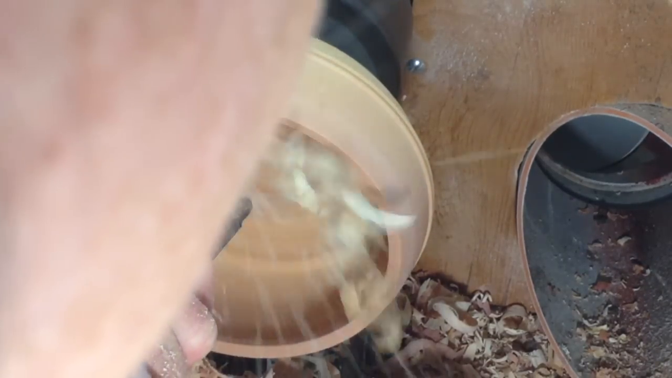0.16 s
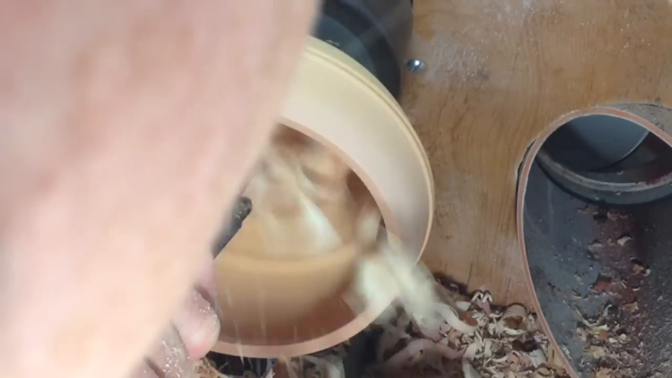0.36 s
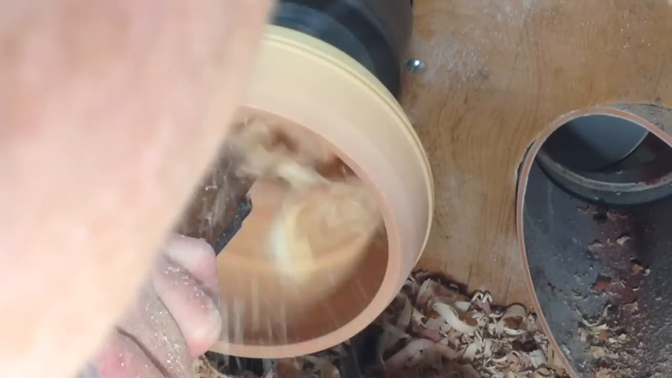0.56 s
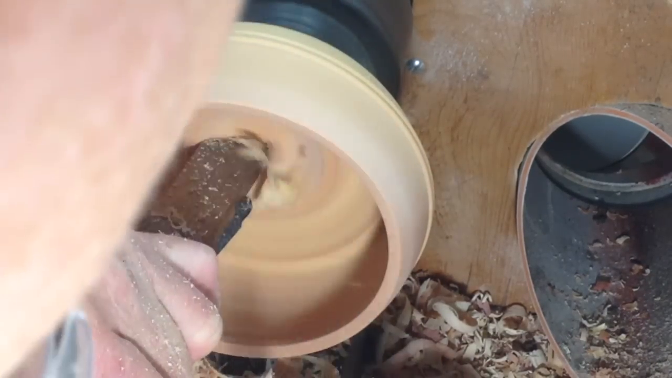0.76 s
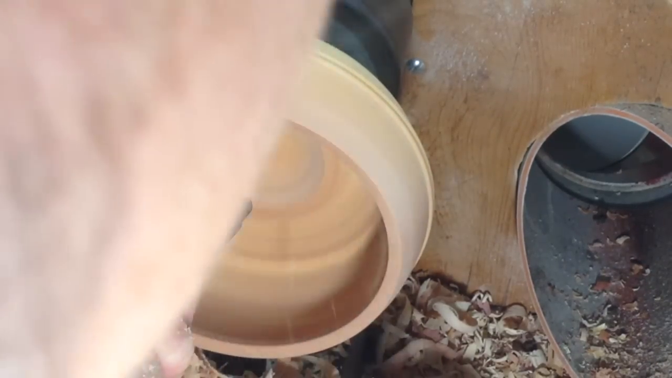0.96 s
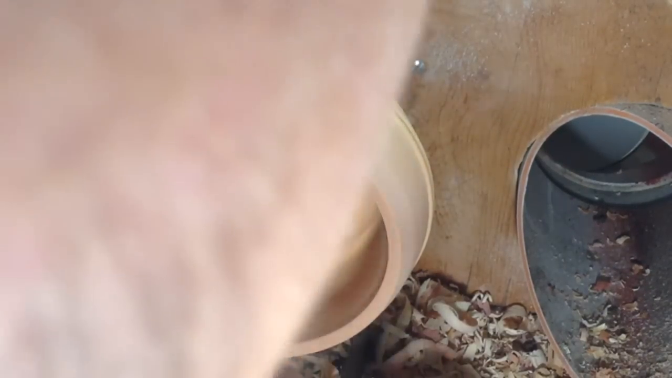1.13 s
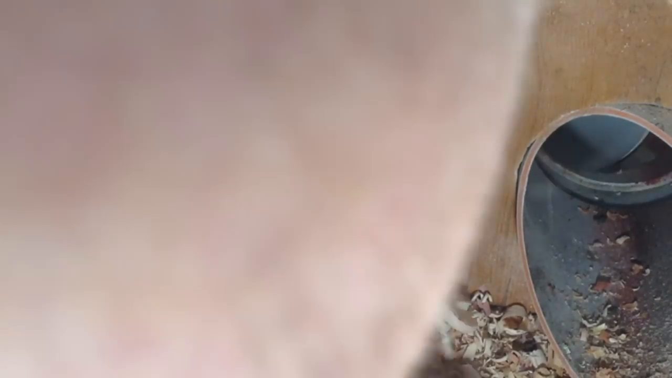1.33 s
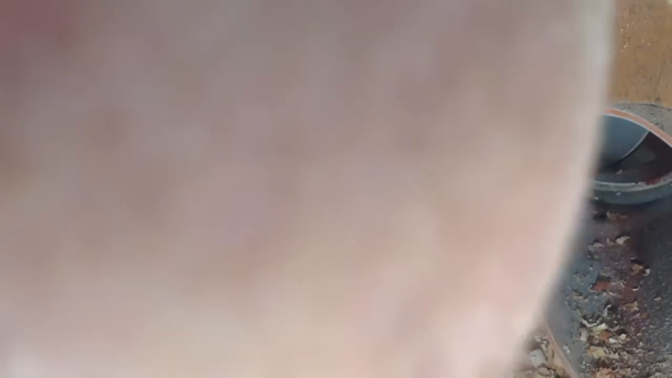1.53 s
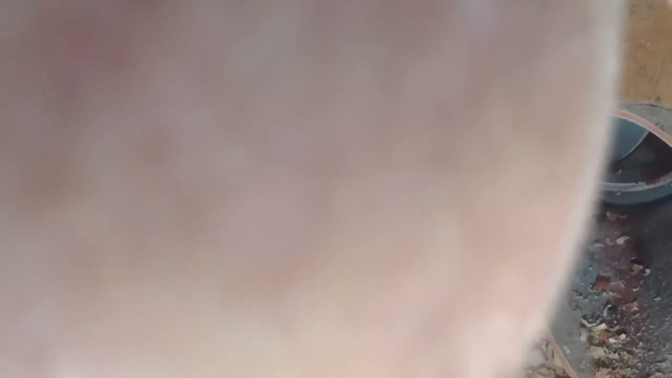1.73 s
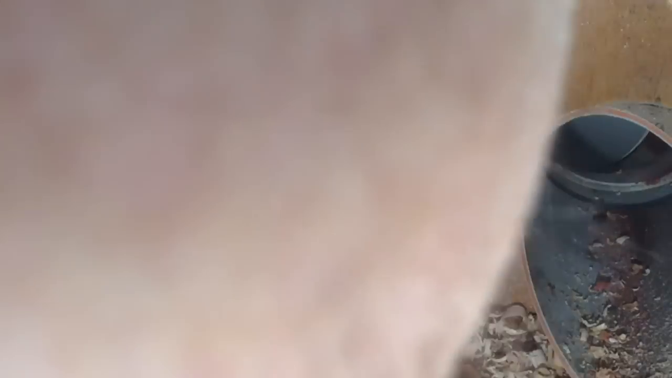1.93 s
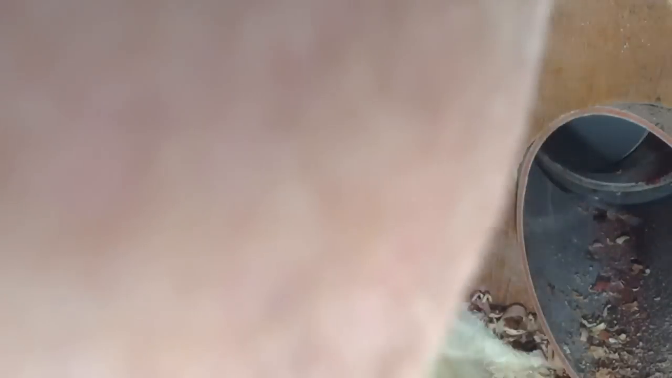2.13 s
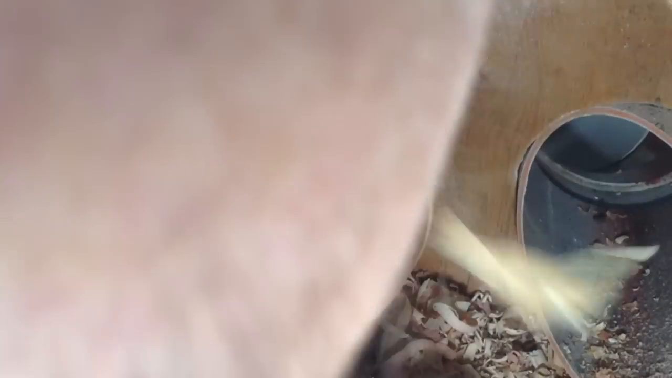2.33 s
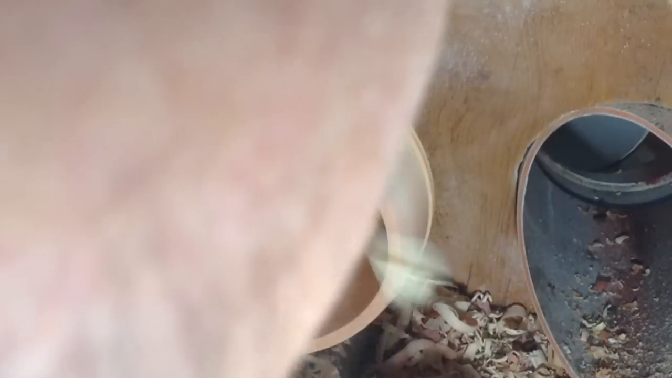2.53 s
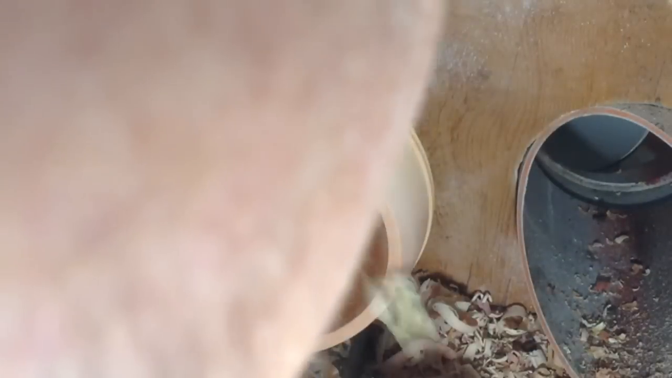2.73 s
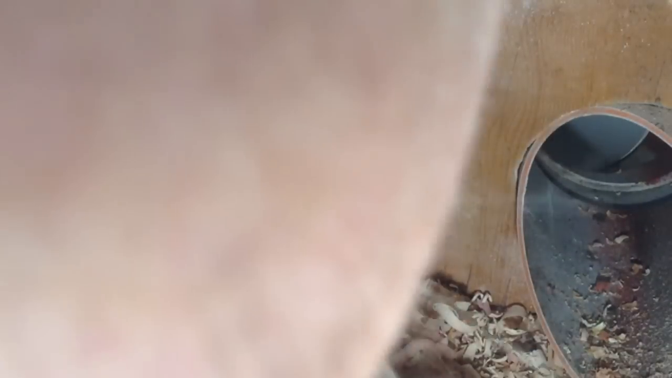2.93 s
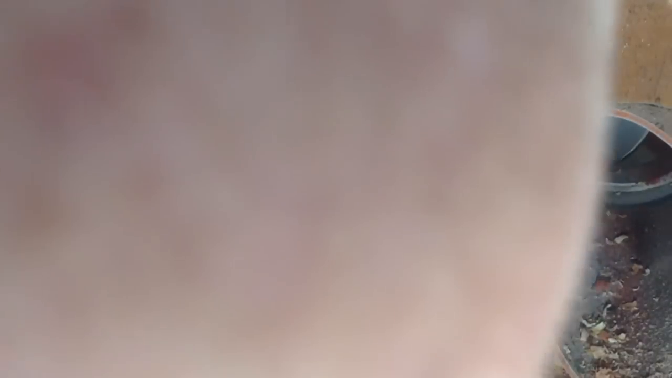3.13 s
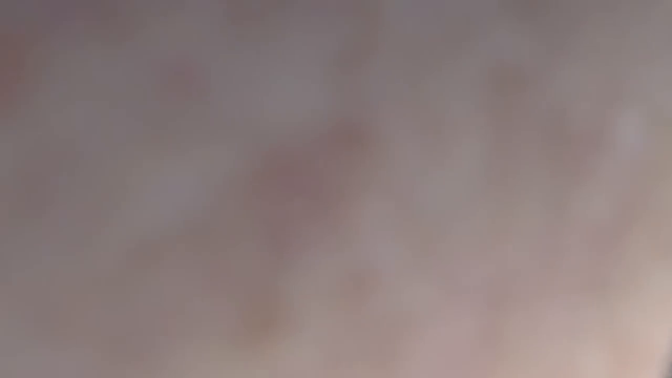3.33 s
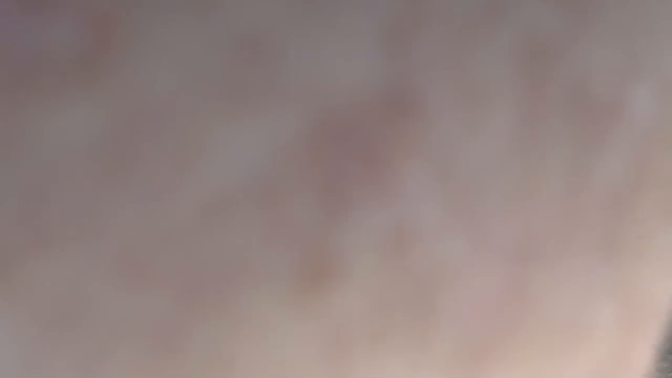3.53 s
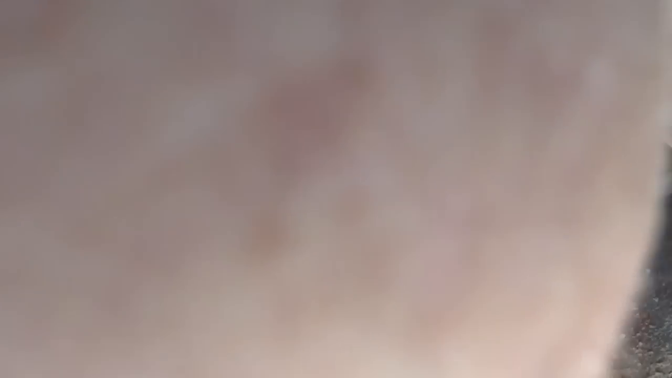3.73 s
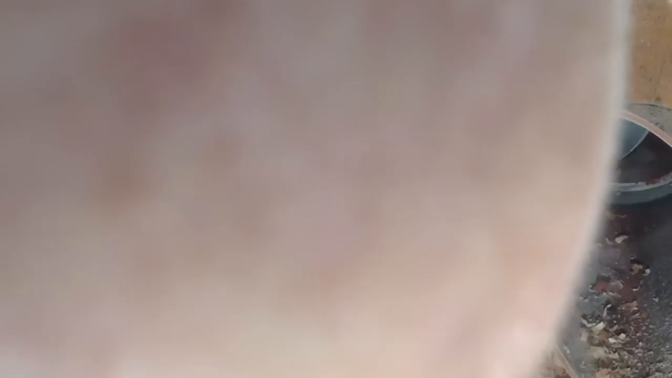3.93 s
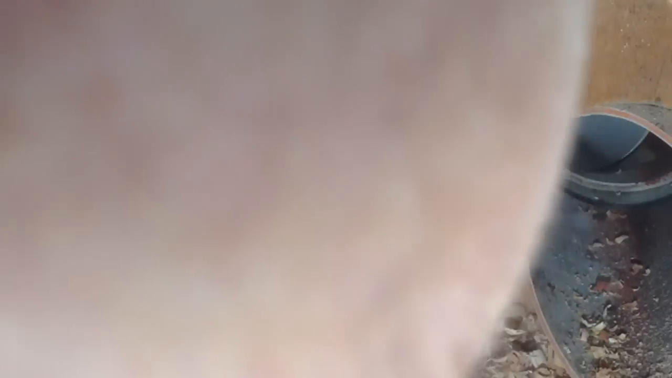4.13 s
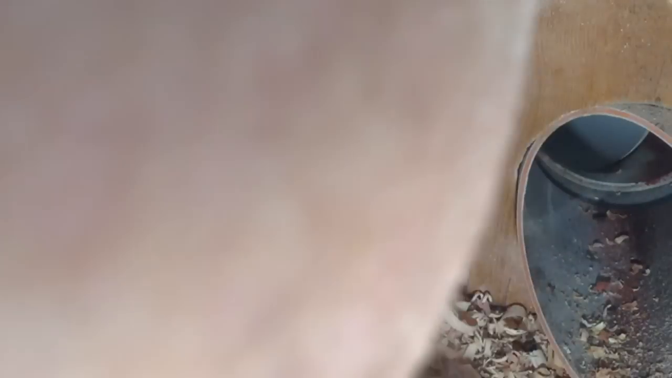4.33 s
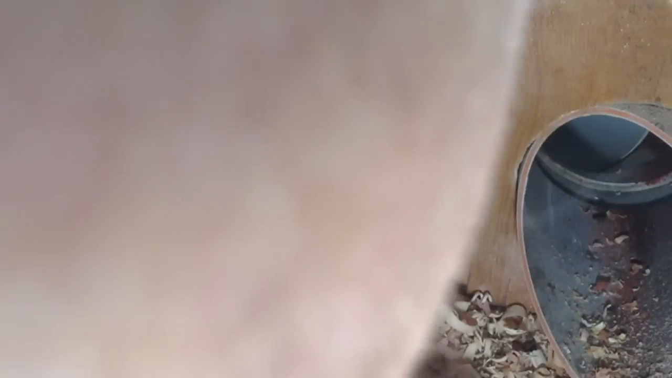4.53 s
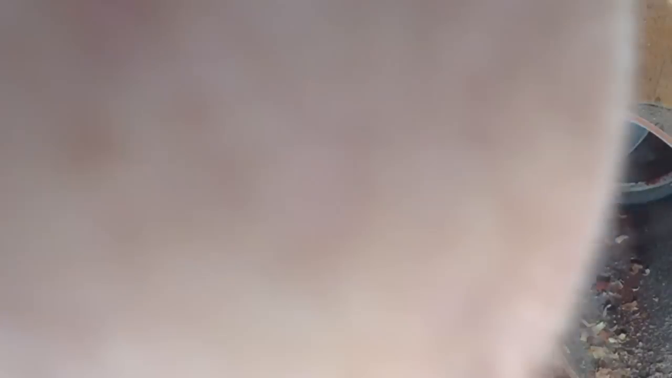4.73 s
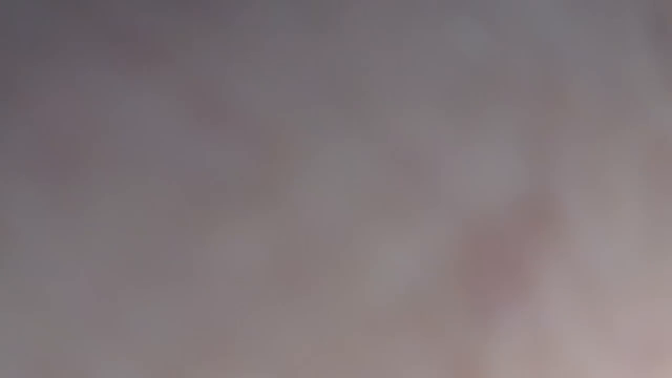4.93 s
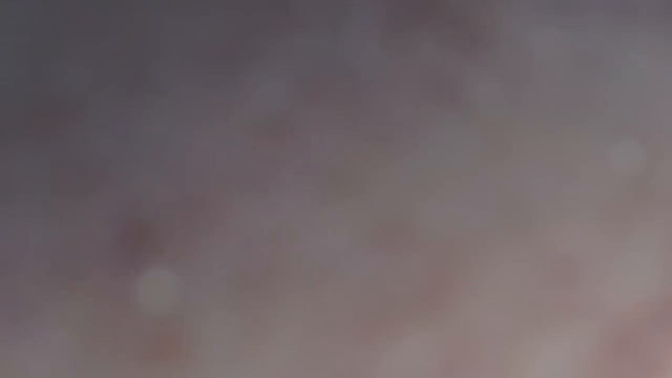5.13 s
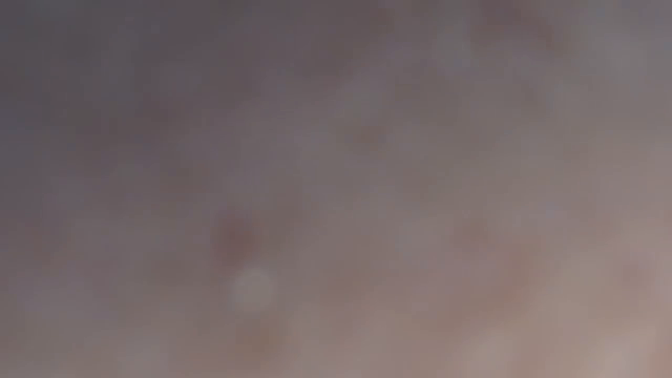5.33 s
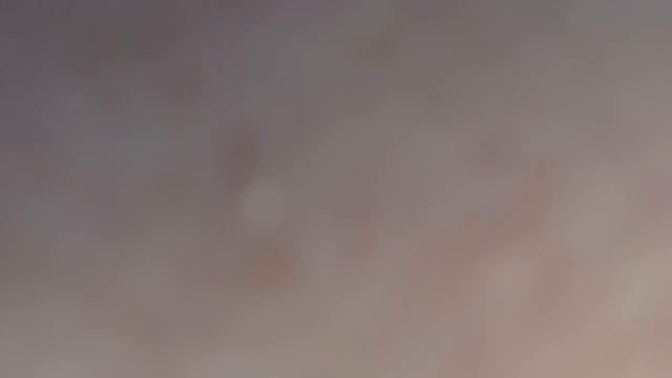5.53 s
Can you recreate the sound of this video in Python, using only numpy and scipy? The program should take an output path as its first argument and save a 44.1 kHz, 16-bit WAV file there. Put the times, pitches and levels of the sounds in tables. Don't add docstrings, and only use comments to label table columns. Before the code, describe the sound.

A wood lathe spins at about 22 turns a second while a hand scraper cuts inside a bowl. From 0 s a coarse, hissing rasp flutters with the rotation, with scuffs and a strong low chatter near 220 Hz at about 0.5-0.65 s, then it lifts off. A very faint touch comes at 0.85 s over quiet motor hum. At 1.1 s a light, bright scrape begins, swelling after 1.35 s into a full rasp, with a knock and loud chatter around 2.2 s. A new stroke from 2.36 to 3.35 s swells, shudders briefly near 2.7 s, eases and swells again. A firm stroke from 3.4 to 4.43 s is rough and steady, with chatter and sharp ticks. Motor and belt idle softly until 5.1 s, when a thin, light scrape returns, growing woodier towards the end at 5.6 s. Close small microphone, short dry room, slight overload.

```python
import sys
import numpy as np
from scipy import signal
from scipy.fft import next_fast_len
from scipy.io import wavfile
from scipy.ndimage import uniform_filter1d

SR = 44100
rng = np.random.default_rng(int(sys.argv[2]) if len(sys.argv) > 2 else 0)


def nominal_scale(level):
    x = np.asarray(level, float) / 20
    return 10 ** x


def inscribe(sig):
    pcm = np.round(np.clip(np.atleast_2d(sig).T, -1, 1) * 32767)
    wavfile.write(sys.argv[1], SR, pcm.astype(np.int16))


N = 250047
T = np.arange(N) / SR

# start_s, level_db
PRESSURE = [
    [(0, -26), (.43, -25), (.54, -23.5), (.6, -23), (.63, -27.5), (.728, -55), (.8, -59)],
    [(.835, -61), (.843, -43.5), (.889, -43.5), (.905, -66)],
    [(1.122, -62), (1.132, -36), (1.2, -36.5), (1.31, -36.5), (1.37, -27.5), (1.84, -22), (2.28, -24.5),
     (2.34, -33.5), (2.355, -55.5)],
    [(2.356, -46), (2.39, -31.5), (2.5, -25.5), (2.69, -27.5), (2.8, -33), (2.94, -32.5), (3.19, -24.5),
     (3.28, -30.5), (3.37, -71)],
    [(3.408, -52), (3.413, -33), (3.435, -27), (3.53, -34.5), (3.55, -28.5), (3.817, -24), (4.37, -23.5),
     (4.429, -53), (4.52, -84)],
    [(5.105, -63), (5.15, -44.5), (5.22, -43), (5.38, -39), (5.49, -38.5), (5.567, -33), (5.67, -38)],
]
# start_s, bowl_wall_db, shank_ring_db, blade_ring_db, edge_skim_db
HOLDS = [(0, -3.5, -7, -14, -7), (0.832, -8, -3, -7, -5), (1.1, -2.5, 2, 1, 0.5), (1.36, 0.2, -9, 4.4, 1),
         (2.36, -0.5, 2, 4.5, -4), (2.85, 1, -5, -1.5, 2.2), (3.4, 1.8, 5.5, -2, 5.5),
         (3.55, 0.9, -10, 1.5, 5.5), (3.88, -0.2, -17, 8, -0.5), (4.22, -0.3, 7, 6, -4.5),
         (5.1, 3.5, 10.5, -13, 10.5), (5.4, 7.5, -6, -5, 13)]
# start_s, level_db
SEAT = [(0, 3.5), (.7, 2), (1.36, 1.3), (2.33, -2.5), (2.5, 1.5), (2.77, -1), (3.02, -0.8), (3.55, 1.5),
        (4.3, -2.5), (5.4, 0.7)]
FRESH_TOUCHES = [1.125, 3.408, 5.13]
# start_s, lead_turns
LEAD = [(0, -0.14), (.6, -0.22), (1.3, 0.26), (1.7, 0.23), (2.3, 0.16), (2.9, 0.46), (3.3, 0.57),
        (3.5, 0.72), (4.1, 0.62), (4.4, 0.71), (5.1, 0.67), (5.3, 0.76), (5.43, 0.88), (5.67, 0.98)]
# pitch_hz, level_db (density per Hz)
RASP = [(530, -1), (900, -11.5), (1290, 3), (1790, -5.5), (1970, -7.5), (2250, 1), (2470, -7.5), (3100, -1),
        (3930, -11), (5360, -13.5), (7750, -22.5), (11600, -28.5), (15400, -33)]
# pitch_hz, width_hz, level_db (over the rasp)
BODY_MODES = [(1320, 210, -2.5), (1420, 55, 2), (1840, 180, 5), (2377, 480, 5.5), (2647, 63, 8.5),
              (3090, 36, 7), (3315, 65, 7.5), (3874, 310, 4.5), (4290, 190, 4), (6310, 92, 4),
              (6900, 200, 1.5), (7900, 200, -4), (8900, 240, 3)]
# pitch_hz, width_hz, level_db (to the layer they ride on)
SHANK = [(2168, 144, -7), (3153, 220, -15.5)]
BLADE = [(5237, 170, -10), (5370, 190, -11.5)]
EDGE = [(11200, 550, -20.5)]
# pitch_hz, width_hz, level_db
REST_MODES = [(206.5, 27, 0), (239.5, 22, 5.5), (294, 7.1, 3.5), (338, 10.7, -2.5), (381.2, 11.4, 2.5),
              (425.7, 12.5, 2), (488, 5.8, -3), (550, 107, -5.5), (682, 40, -7), (776, 60, -3),
              (952, 48, -8.5)]
# pitch_hz, level_db (density per Hz)
WASH = [(35, -33), (60, -13), (95, -10), (165, -6), (260, -7), (450, -13.5), (760, -17), (1250, -15.5),
        (2300, -22), (4700, -24), (8000, -32), (15400, -42)]
# pitch_hz, width_hz, level_db (over the wash)
HOUSING = [(402, 40, 3.5), (1190, 330, 3), (1460, 60, 5), (2900, 530, 6), (3650, 50, 11.5),
           (4970, 930, 4.5), (6000, 250, 7), (10300, 300, 3)]
# pitch_hz, level_db
HUM = [(23, -47), (49.5, -56), (151, -63), (176, -62), (311, -55.5), (620, -67)]
# start_s, pitch_hz, upper_over_lower_line_db, strongest_place_turns
CHATTER = [(0, 216.4, -30, 0.13), (.25, 215.7, 10, 0.16), (.4, 219.2, -7.5, 0.27), (.55, 222.1, 5.5, 0.24),
           (.72, 230, 4, 0.3), (1.5, 212.5, -10, 0.17), (1.95, 210, 2, 0.26), (2.1, 221.7, -1, 0.19),
           (2.3, 225.1, 2, 0.32), (2.45, 227.5, 21, 0.28), (2.62, 218.9, -11, 0.41),
           (2.75, 225.2, -6.5, 0.65), (2.9, 231.3, 10, .35), (3.8, 232, 10, 0.16), (4.12, 224, 12, .2),
           (4.3, 225.3, -12, 0.31), (4.5, 234, -6, 0.19), (5.5, 231, 17, .22)]
# full_s, release_s, level_db, growth_db_per_s, gouging_db (passed to rest and bowl)
BOUTS = [(0.096, 0.308, -31.5, 90, 10), (0.513, 0.649, -8.5, 102, 2), (2.098, 2.095, -23.5, 30.5, 6.5),
         (2.223, 2.311, -10, 70, -5.5), (2.46, 2.58, -33, 200, 15), (2.628, 2.66, -21, 250, 3),
         (2.684, 2.747, -14, 200, 0), (3.01, 3.049, -32.5, 200, 4), (3.472, 3.469, -26.5, 300, 7),
         (3.72, 3.965, -24, 62, .3), (4.27, 4.404, -20, 53, -1.5), (5.462, 5.57, -33, 350, -9),
         (5.6, 5.698, -25, 50, -9)]
# first_s, last_s, peak_db, pitch_hz, dry_scuff_share (0-1)
TICKS = [(0.072, .164, -11.5, 2820, 0.6), (.2553, .2553, -18, 1250, 0.3), (.408, .408, -9.5, 2460, 0.4),
         (0.841, .8849, -31, 2190, 0.84), (1.3493, 1.3498, -16, 2170, .35), (2.133, 2.133, -9.5, 1270, 0.2),
         (2.2223, 2.2223, -4.5, 1330, 0.56), (3.4267, 3.4271, -9, 2090, 0.56),
         (3.6737, 3.6736, -14, 1345, 0.62), (3.8077, 3.8077, -7, 2210, 0.76),
         (3.9877, 4.0332, -10, 1603, 0.82), (4.2115, 4.3006, -5, 2118, 0.61), (4.274, 4.319, -8.5, 3130, 0),
         (4.7431, 4.791, -35, 1650, 0.63), (4.9861, 4.9861, -37, 1340, .4),
         (5.1454, 5.3198, -18, 2150, 0.42), (5.3841, 5.5156, -16.5, 1225, 0.5),
         (5.5554, 5.5558, -7.5, 1320, 0.4)]
# start_s (the middle), pitch_hz, length_s, level_db
GROANS = [
    (.89, 240, .025, -45),
    (2.73, 92, .03, -36),
    (4.28, 292, .04, -31),
    (5.405, 392, .028, -30),
]

SPINDLE_PER_S = 22.4
FULL_DB = -24
HISS_DB, HISS_PER_SKIM, EDGE_PER_SKIM, FINEST_PER_SKIM = -4, 0.55, 0.19, 0.23
LIGHT_EDGE, LIGHT_FINEST = 0.2, 0.27
ENTRY_DB, ENTRY_S = 11, 0.13
RUN_OUT, RUN_OUT_PER_DB, FAR_SIDE_S = 1.01, 0.1, 4.9
REST_DB, REST_SLOPE, BED_DB, BED_SLOPE = -28.5, 0.87, -35, 1.25
DIES_DB_PER_S, TAKES_HOLD_DB = 258, -28
CHATTER_UNDER_DB, UNDER_SLOPE = -6.5, 1.9
CHATTER_IN_REST_DB, CHATTER_IN_BOWL_DB = -12.5, -21.5


def evened(x):
    return x / np.sqrt(np.mean(x ** 2) + 1e-20)


def curve(rows, order=1):
    rows = np.array(rows)
    return np.interp(T, rows[:, 0], rows[:, order])


def level(db):
    return uniform_filter1d(nominal_scale(db), size=120)


def colour(x, gain_of_hz):
    size = next_fast_len(N + 8192, real=True)
    hz = abs(np.fft.fftfreq(size, 1 / SR))
    log_gain = np.log(gain_of_hz(hz) + 1e-5)
    response = np.exp(np.conj(signal.hilbert(log_gain)))
    return np.fft.ifft(np.fft.fft(x, size) * response).real[:N]


def shape(points, hz):
    f, db = np.transpose(points)
    return nominal_scale(np.interp(np.log(hz + 1), np.log(f + 1), db))


def peak(hz, centre_hz, width):
    return 1 / (1 + (2 * (hz - centre_hz) / width) ** 2)


def modal_gain(modes, hz):
    return nominal_scale(sum(db * peak(hz, f, w) for f, w, db in modes))


def band(hz, lo_hz, hi_hz):
    return 1 / np.sqrt((1 + (lo_hz / (hz + 1)) ** 16) * (1 + (hz / hi_hz) ** 16))


def own_grain(x):
    return x * rng.choice([-1., 1.], N)


def angle():
    return SPINDLE_PER_S * T + curve(LEAD) + 1


def surface(memory, size):
    fresh = rng.standard_normal((int(SPINDLE_PER_S * T[-1]) + 4, size))
    kept = signal.lfilter([1], [1, -np.clip(memory, 0, .95)], fresh, axis=0).ravel()
    return evened(np.interp(angle() * size, np.arange(len(kept)), kept))


def bite(turns, fade):
    tooth = uniform_filter1d(np.exp(-(turns % 1) / fade), size=170)
    return evened(tooth - tooth.mean())


def throb(once_db, twice_db, knots_db, knots):
    turns = angle()
    high_side = 1.16 * np.cos(2 * np.pi * (turns + 0.76)) + 0.13 * bite(turns + 0.19, 0.59)
    end_grain = bite(2 * turns + 0.078, 0.38)
    return evened(nominal_scale(once_db * high_side + twice_db * end_grain + knots_db * knots))


def hold(order, rows=HOLDS):
    rows = np.array(rows)
    return uniform_filter1d(rows[np.searchsorted(rows[1:, 0], T), order], size=2500)


def pressure():
    out = np.full(N, -120.)
    for rows in PRESSURE:
        in_pass = (T >= rows[0][0]) & (T <= rows[-1][0])
        out = np.where(in_pass, curve(rows), out)
    return out


def load(press_db, at_full_db, slope, seat):
    load_db = press_db + hold(order=1) - FULL_DB
    return level(at_full_db + slope * load_db + seat * hold(order=1, rows=SEAT))


def run_out(press_db):
    felt = np.clip(RUN_OUT + RUN_OUT_PER_DB * (press_db - FULL_DB), .3, 1.5)
    return uniform_filter1d(felt * np.where(T < FAR_SIDE_S, 1, -1), size=2500)


def entry():
    starts = np.array(FRESH_TOUCHES)
    since = T - starts[np.maximum(np.searchsorted(starts, T) - 1, 0)]
    return ENTRY_DB * np.exp(-abs(since) / ENTRY_S) * (since > 0)


def chatter_gain(press_db, gouging=False):
    t, slow_db = T[::16], press_db[::16]
    power = nominal_scale(FULL_DB + CHATTER_UNDER_DB + UNDER_SLOPE * (slow_db - FULL_DB)) ** 2
    slack_db = 1.9 * np.minimum(slow_db - TAKES_HOLD_DB, 0)
    for full, end, db, growth, gouge_db in BOUTS:
        growing_db = growth * (t - full) + slack_db
        dying_db = -DIES_DB_PER_S * np.maximum(t - end, 0)
        swell_db = np.where(t < full, growing_db, dying_db)
        power += nominal_scale(db + gouging * gouge_db + swell_db) ** 2
    return np.interp(T, t, uniform_filter1d(np.sqrt(power), size=8))


def rings(x, modes):
    x = own_grain(x)
    return sum(nominal_scale(db) * evened(colour(x, lambda hz: peak(hz, f, w) ** 0.96)) for f, w, db in modes)


def tearing():
    sizes = nominal_scale(2.1 * np.minimum(rng.exponential(1, N), 5))
    snaps = sizes * (rng.random(N) < 11000 / SR)
    return evened(evened(snaps * rng.standard_normal(N)) + 0.81 * surface(0.52, size=2048))


def rasp(press_db, gouge):
    tear = tearing()
    knots, felt = surface(0.59, size=16), run_out(press_db)
    low = tear * throb(1.2 * felt, 1.6, 1.92, knots)
    middle = own_grain(tear * throb(2.1 * felt, 0.79, 2.3, knots))
    high = tear * throb(2.7 * felt, 1.3, 1.0, knots)

    shank, blade, skim_db = nominal_scale(hold(order=2)), nominal_scale(hold(order=3)), hold(order=4)
    light_db = np.clip(FULL_DB - press_db, 0, 14)
    edge = nominal_scale(EDGE_PER_SKIM * skim_db + LIGHT_EDGE * light_db + entry() - 4)
    finest = nominal_scale(FINEST_PER_SKIM * skim_db + LIGHT_FINEST * light_db)

    def body(hz):
        return shape(RASP, hz) * modal_gain(BODY_MODES, hz)

    bowl = evened(colour(low, lambda hz: body(hz) * band(hz, 1020, 1900)))
    tool = evened(colour(middle, lambda hz: body(hz) * band(hz, 1900, 4000)))
    tool += shank * rings(middle, SHANK)
    hiss = evened(colour(high, lambda hz: body(hz) * band(hz, 4000, 9700)))
    hiss += blade * nominal_scale(0.4 * entry()) * rings(high, BLADE)
    air = evened(colour(own_grain(high), lambda hz: body(hz) * band(hz, 10200, 20500)))
    hiss += finest * nominal_scale(-13.5) * air
    dust = high * np.sign(np.roll(tear, shift=999))
    hiss += nominal_scale(-22.5) / blade * evened(colour(dust, lambda hz: band(hz, 6600, 8200)))
    hiss += edge * rings(high, EDGE)

    wall = np.hypot(level(press_db + hold(order=1)), nominal_scale(CHATTER_IN_BOWL_DB) * gouge)
    return wall * bowl + level(press_db) * (tool + nominal_scale(HISS_DB + HISS_PER_SKIM * skim_db) * hiss)


def patchy(x, depth_db):
    z = signal.stft(x, nperseg=512, noverlap=384)[2]
    over_hz = uniform_filter1d(rng.standard_normal(z.shape), size=5, axis=0)
    patches = uniform_filter1d(over_hz, size=22, axis=1)
    return signal.istft(z * nominal_scale(depth_db * evened(patches)), nperseg=512, noverlap=384)[1][:N]


def rest(press_db, gouge):
    hard_patches = surface(1.0, size=12)
    force = surface(0.59, size=256) * throb(0.3 * run_out(press_db), 0.71, 2.9, hard_patches)

    def modes(hz):
        power = sum(nominal_scale(2 * db) * peak(hz, f, w) for f, w, db in REST_MODES)
        return np.sqrt(power) * band(hz, 148.0, 1040)

    pressed = nominal_scale(-.6 * entry()) * load(press_db, REST_DB, REST_SLOPE, seat=0.12)
    drive = np.hypot(pressed, nominal_scale(CHATTER_IN_REST_DB) * gouge)
    return nominal_scale(1.6) * drive * evened(colour(force, modes))


def bed(press_db):
    a = 2 * np.pi * angle()
    orders = np.cos(2 * a + 1.1) + 0.15 * np.cos(3 * a + 0.4)
    orders += 0.28 * np.cos(4 * a + 2.7) + 0.075 * np.cos(5 * a + 0.27)
    rumble = evened(colour(rng.standard_normal(N), lambda hz: band(hz, 24, 116)))
    shaken = load(press_db, BED_DB, BED_SLOPE, seat=1.8) * (orders + 0.12 * rumble)
    return 1.03 * shaken + nominal_scale(-68.0) * rumble


def idle():
    flutter = nominal_scale(1.2 * surface(1.0, size=10))
    gusts = rng.standard_normal(N) * flutter
    wash = colour(gusts, lambda hz: shape(WASH, hz) * modal_gain(HOUSING, hz))
    hum = np.zeros(N)
    for hz, db in HUM:
        waver = evened(uniform_filter1d(rng.standard_normal(N), size=5000))
        hum += np.sqrt(2) * nominal_scale(db + .8 * waver) * np.sin(2 * np.pi * (hz * T + rng.random()))
    return nominal_scale(-50.0) * evened(wash) + hum


def chatter(gain):
    wander = evened(uniform_filter1d(rng.standard_normal(N), size=1500))
    swing = 2 * np.pi * np.cumsum(curve(CHATTER) + 4.16 * wander) / SR
    half_turn = np.pi * (angle() - curve(CHATTER, order=3))
    upper = nominal_scale(curve(CHATTER, order=2))
    lines = np.cos(swing - half_turn) + upper * np.cos(swing + half_turn)
    pair = lines * np.sqrt(2 / (1 + upper ** 2))
    slaps = np.maximum(pair - 1.2, 0) ** 1.5
    knocks = evened(slaps * (1 + 0.8 * surface(.3, size=40)))
    bounce = pair + 0.082 * (pair ** 2 - 1) + 0.57 * gain * knocks
    return nominal_scale(-1.04) * gain * bounce


def ticks():
    out, t = np.zeros(N + 2000), np.arange(2000) / SR
    for (first, last, db, hz, dry), scuffs in zip(TICKS, rng.standard_normal((len(TICKS), 5, 2000))):
        times = np.linspace(first, last, round((last - first) * SPINDLE_PER_S) + 1)
        for s, scuff in zip(times, scuffs):
            tone = np.sin(2 * np.pi * hz * (1 + 0.0093 * scuff[1]) * t) * np.exp(-t / 0.0033)
            ring = (1 - dry) * tone + 1.08 * dry * scuff * np.exp(-t / 0.0054)
            onset = np.minimum(t / 0.0015, 1)
            out[round(s * SR):][:2000] += nominal_scale(db + 3.0 + 0.74 * scuff[0]) * ring * onset
    return colour(out[:N], lambda hz: band(hz, 790, 4430))


def groans():
    out = np.zeros(N)
    for s, hz, length, db in GROANS:
        out += nominal_scale(db) * np.exp(-((T - s) / length) ** 2) * np.sin(2 * np.pi * hz * T)
    return out


def room(x):
    taps = np.zeros(SR // 2)
    at = np.arange(200, len(taps) - 22, 22)
    signs = rng.choice([-1., 1.], len(at))
    taps[at + rng.integers(0, 22, len(at))] = signs * nominal_scale(-60 * at / SR / 0.2)
    return signal.oaconvolve(x, taps / np.linalg.norm(taps))[:N]


def scene():
    press_db = pressure()
    gouge = chatter_gain(press_db, gouging=True)
    cut = patchy(rasp(press_db, gouge), depth_db=0.76) + rest(press_db, gouge) + ticks() + groans()
    lathe = bed(press_db) + idle()
    return (cut + nominal_scale(-15.0) * room(cut) + chatter(chatter_gain(press_db)) + lathe)[None]


def top_cut(x):
    return signal.sosfilt(signal.butter(12, 15600, fs=SR, output="sos"), x)


def record(dry):
    ceiling = .59
    soft = dry / (1 + abs(dry / ceiling) ** 5) ** (1 / 5)
    taps = signal.firwin(511, 15380, window=("kaiser", 9), fs=SR)
    mix = signal.oaconvolve(soft, taps[None], "same")
    return top_cut(mix)


dry = scene()
out = record(dry)
inscribe(out)
```